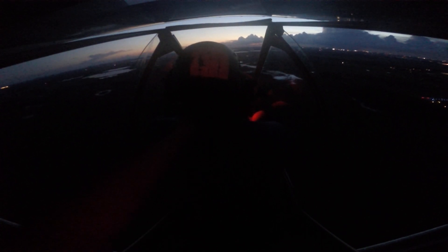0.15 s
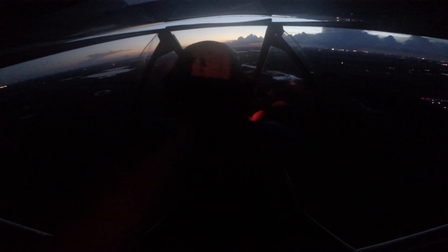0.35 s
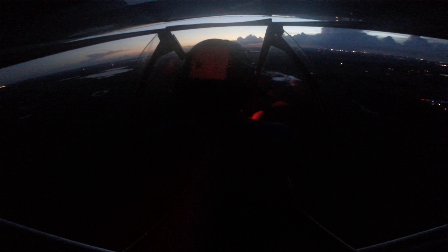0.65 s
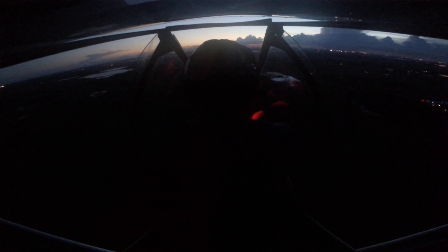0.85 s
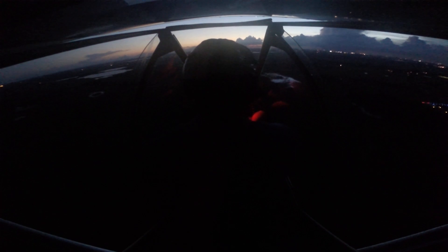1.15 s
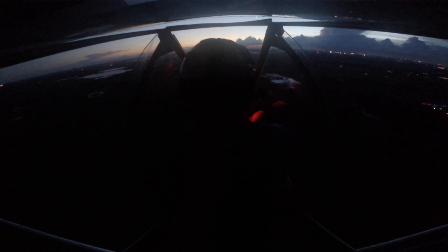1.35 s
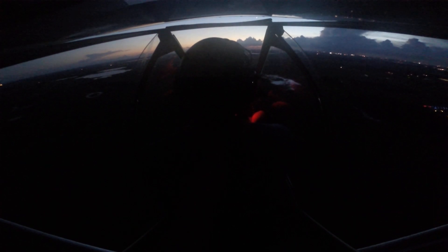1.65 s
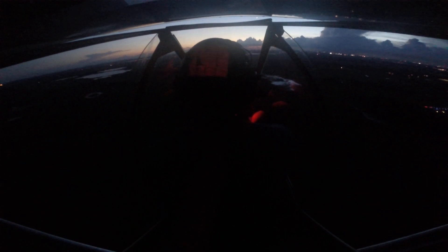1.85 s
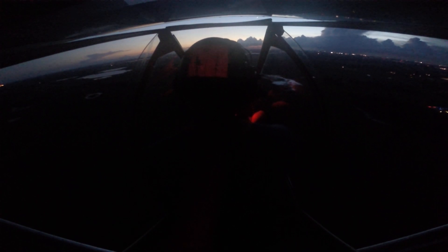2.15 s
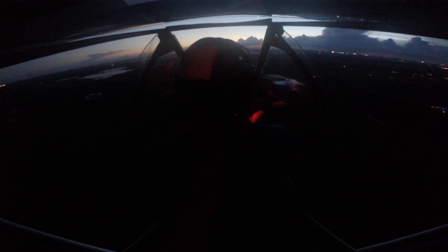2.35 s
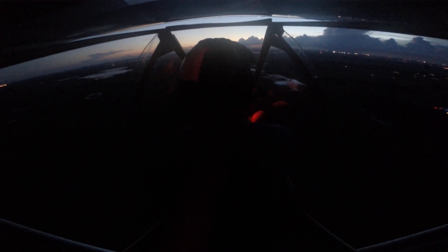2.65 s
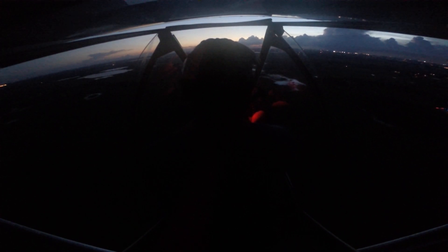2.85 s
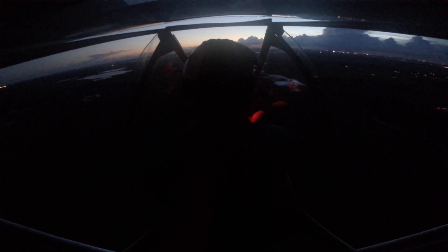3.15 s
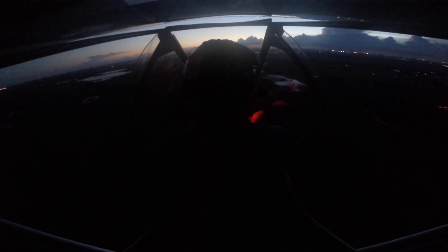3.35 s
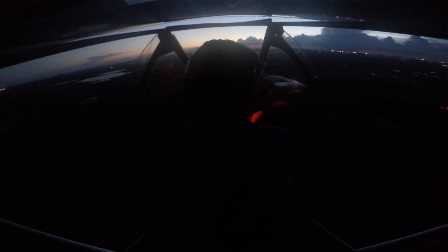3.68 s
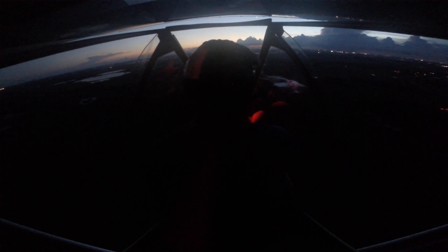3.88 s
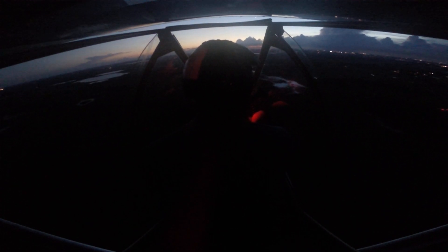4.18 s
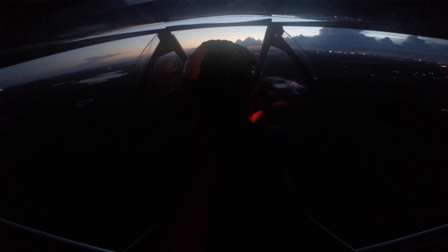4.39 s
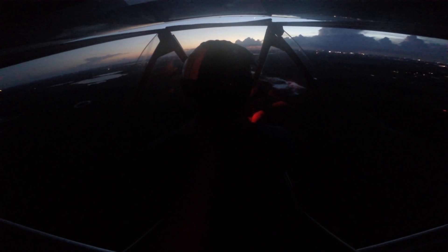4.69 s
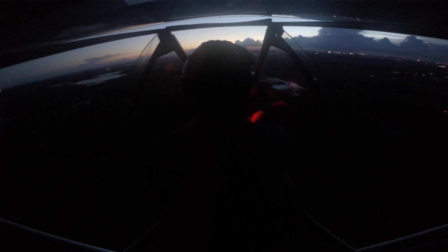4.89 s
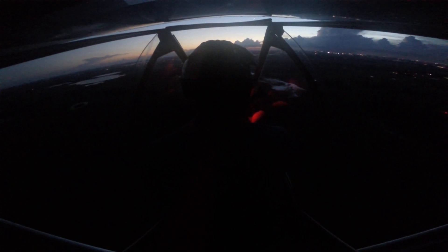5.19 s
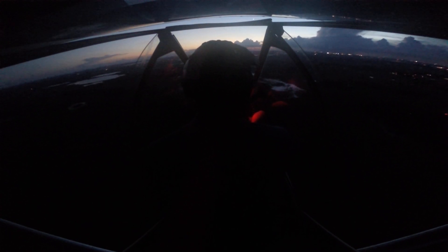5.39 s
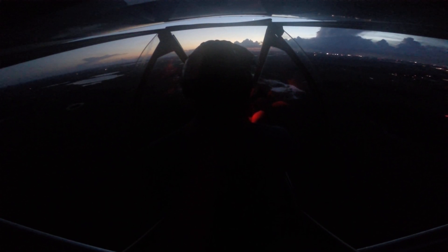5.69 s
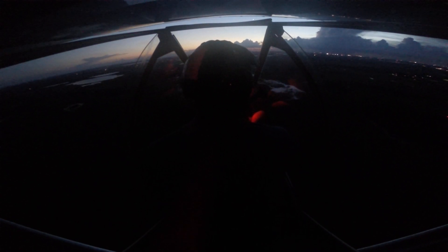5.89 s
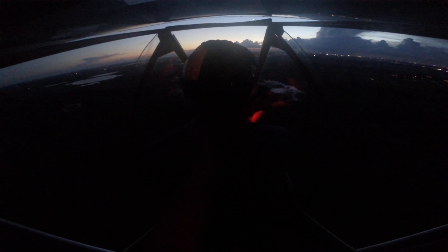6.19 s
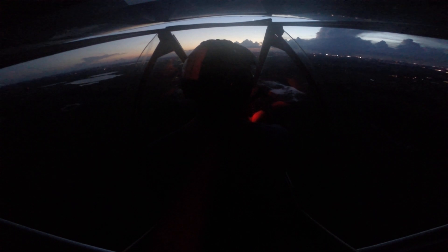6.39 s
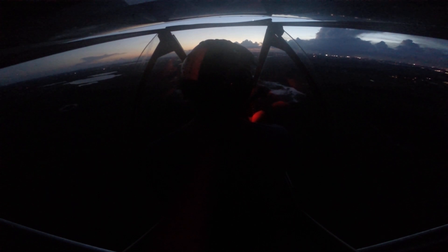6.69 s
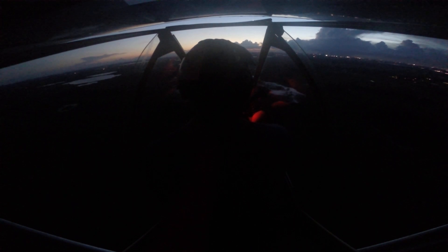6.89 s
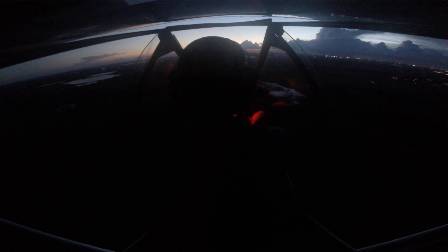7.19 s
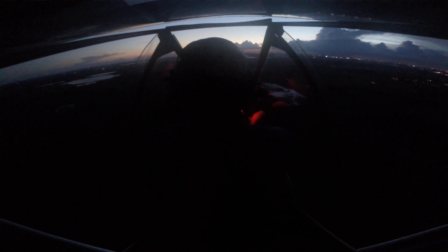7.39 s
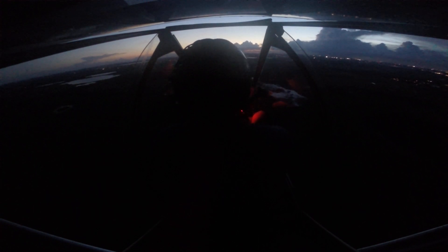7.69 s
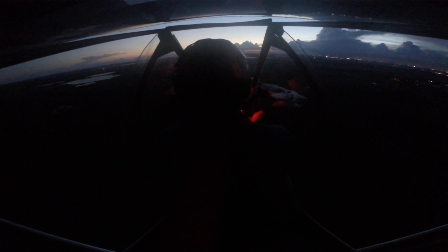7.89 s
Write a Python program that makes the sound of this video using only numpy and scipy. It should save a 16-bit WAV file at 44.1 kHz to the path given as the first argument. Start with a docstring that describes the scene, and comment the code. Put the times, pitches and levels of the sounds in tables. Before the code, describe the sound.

A continuous raspy engine drone with low propeller throb fills a small open aircraft, heard from just behind the pilot. Rattling and panel buzz ride on it, then soften as the engine slows slightly and its tone colour shifts. Buffeting wind and grainy hiss grow a little stronger. In the last couple of seconds irregular clacks and brief metal ticks join.

```python
"""Ultralight cockpit in flight

The open cockpit: a two-stroke twin, built from exhaust overtones, turns a geared three-blade propeller.
The throttle is eased after two seconds, so the overtones change weight and slide through the cabin's
resonances, while the wash of filtered noise grows louder. A panel buzzes at cruise power and then fades
back; later noise bursts clack in the frame, and a loose fitting ticks with short decaying sines."""
import sys
import numpy as np
from scipy import signal
from scipy.fft import rfft, irfft, next_fast_len
from scipy.io import wavfile
from scipy.ndimage import uniform_filter1d, map_coordinates

SR = 44100
rng = np.random.default_rng(int(sys.argv[2]) if len(sys.argv) > 2 else 0)


def master(y):
    """Save y as 16-bit WAV."""
    cut = np.clip(np.atleast_2d(y).T, -1, 1)
    pcm = np.round(cut * 32767)  # scale
    wavfile.write(sys.argv[1], SR, pcm.astype(np.int16))


N = 354563
TIME = np.arange(N) / SR  # s

CRUISE_HZ, EASED_HZ = 90.4, 83.4  # crank turns per second that count as cruise and as fully eased
GEAR = 2.58  # crank turns per propeller turn
# crank speed: it drifts at cruise, settles lower when the throttle is eased, then sags on
START_HZ, DRIFT_HZ_PER_S = 90.53, 0.125
EASE_AT_S, EASE_DROP_HZ, SETTLE_S, SAG_HZ_PER_S = 2.35, 3.53, 0.81, 0.6
# turbulent wash: cruise level, rise as the engine slows, and one quick swell
WASH_DB, WASH_RISE_DB = -39, 2
SWELL_AT_S, SWELL_S, SWELL_DB = 2.85, 0.55, 1.72
# the panel's buzz holds at cruise, then drops
BUZZ_DB, BUZZ_HOLD_S, BUZZ_RELEASE_S, BUZZ_DROP_DB = -44.5, 1.87, 1.3, 10
# the fitting works loose: it is struck on more and more propeller turns, and harder
LOOSE_AT_S, LOOSEN_S = 7.0904, 0.45
TICK_DB, TICK_GROWTH_DB, TICK_SCATTER_DB = -46, 5.5, 3.5  # before the trims in fitting()
FIRST_TICK_CHANCE, LOOSE_TICK_CHANCE = 0.3, 0.55  # share of turns with a tick
TICK_ATTACK_S = 0.0002  # time constant of the ring's onset
TOP_HZ = 15100  # upper edge of the sound

# colour of the slipstream's hiss and the fitting's contact: (frequency [Hz], relative level [dB])
HISS_COLOUR = [(2500, -12), (4000, -11), (4650, 6), (5050, -4), (5600, 0.5), (6700, -8), (7900, -7),
               (9000, -15.5), (9950, -20), (10500, -13), (11250, -22), (11950, -19), (13000, -22.5),
               (15000, -30)]


def undb(db):
    """Decibels to gain."""
    return 10 ** (np.asarray(db) / 20)


def unit(x):
    """Scale to rms 1."""
    return x / np.std(x)


def colour(x, points):
    """Filter by a spectrum of (Hz, dB) points, falling 30 dB an octave outside them; rms 1."""
    hz, db = np.transpose(points)
    size = next_fast_len(N)
    f = np.maximum(np.arange(size // 2 + 1) * SR / size, 1)
    octaves_outside = np.abs(np.log2(f / np.clip(f, hz[0], hz[-1])))
    gain = undb(np.interp(np.log(f), np.log(hz), db) - 30 * octaves_outside)
    return unit(irfft(rfft(x, size) * gain, size)[:N])


def walk(rate):
    """Smooth random wander that changes about rate times a second; rms 1."""
    hold = max(int(SR / rate), 1)
    steps = np.repeat(rng.standard_normal(N // hold + 1), hold)
    smooth = uniform_filter1d(uniform_filter1d(steps, hold), hold)
    return unit(smooth[:N])


def bursts(turns, sharp):
    """A swell to 1 once a turn, narrower as sharp grows."""
    return np.exp(sharp * (np.cos(2 * np.pi * turns) - 1))


def overtone(turns, multiple, lag):
    """One line of a repeating pulse, late by lag of its own cycles; rms 1."""
    return np.sqrt(2) * np.cos(2 * np.pi * (multiple * turns - lag))


def knocks(rows, points, decay_s):
    """Short bursts of coloured noise, each peaking at the level of its (s, dB) row."""
    out = np.zeros(N + SR)
    noise = colour(rng.standard_normal(N), points)
    age = TIME[:SR // 25]
    envelope = age * np.exp(-age / decay_s)
    for index, (s, db) in enumerate(rows):
        burst = noise[index * len(age):][:len(age)] * envelope
        out[int(s * SR):][:len(age)] += undb(db) * burst / np.abs(burst).max()
    return out[:N]


def crank_speed():
    """Turns per second: a slow drift, a quick settling as the throttle is eased, and a steady sag after it."""
    since_ease = np.maximum(TIME - EASE_AT_S, 0)
    cruise = START_HZ - DRIFT_HZ_PER_S * np.minimum(TIME, EASE_AT_S)
    settling = EASE_DROP_HZ * (1 - np.exp(-since_ease / SETTLE_S))
    return cruise - settling - SAG_HZ_PER_S * since_ease


def engine(hz, turns, eased, jitter=0.0013, flutter_db=0.53, roughen=0.18, pulse_lag=0.12, pipe_lag=0.39):
    """Exhaust pulses as a stack of overtones; the firings come a little unevenly."""
    # (multiple of the crank rate, cruise level [dB], eased level [dB]), before the cabin
    exhaust_lines = [(1, -26.5, -20), (2, -26, -21.5), (3, -28.5, -28), (4, -15.5, -22), (5, -35.5, -23.5),
                     (6, -52, -37.5), (7, -48, -48), (8, -32.5, -49.5), (9, -36.5, -39.5), (10, -45, -32.5),
                     (11, -43, -33), (12, -33.5, -44), (13, -37.5, -28), (14, -38.5, -46.5),
                     (15, -40.5, -33.5), (16, -49, -38.5), (17, -50, -48), (18, -42.5, -47),
                     (19, -48.5, -74), (20, -41, -46.5), (21, -40, -48), (22, -54.5, -46.5), (23, -50, -45),
                     (24, -47.5, -37), (25, -39.5, -33.5), (26, -57, -55), (27, -44.5, -34),
                     (28, -49, -42.5), (29, -51.5, -57), (30, -51, -40), (31, -51, -45.5), (32, -57, -40)]
    # peaks and notches the overtones slide through: (centre [Hz], width [Hz], gain [dB])
    cabin_modes = [(260.2, 7, 6), (433.2, 25, 5.5), (706, 13, 5.5), (781, 17, 4.5), (946, 32, 3.5),
                   (1048, 25, -19), (1105, 17, -10.5), (1221, 43.5, 13.5), (1436.7, 66, 22), (1562, 44, 10),
                   (2230, 39, 3.5), (2320, 32, 2)]
    # a two-stroke runs less evenly under a lighter load
    rough = 1 + roughen * eased
    uneven = turns + jitter * rough * walk(45)
    out = 0
    for multiple, cruise_db, eased_db in exhaust_lines:
        line_hz = multiple * hz[::100]  # every 100th sample is enough for the slow slide
        cabin_db = sum(db / (1 + (2 * (line_hz - f) / width) ** 2) for f, width, db in cabin_modes)
        cabin_db = np.interp(TIME, TIME[::100], cabin_db)
        db = cruise_db + eased * (eased_db - cruise_db) + cabin_db
        # the high overtones flutter most in the moving air
        db = db + flutter_db * rough * multiple / 10 * walk(9)
        # the thump comes first, the pipe's ring follows, and reflections scatter everything higher
        lag = pulse_lag + pipe_lag * max(multiple - 3, 0) if multiple < 6 else rng.random()
        out = out + undb(db) * overtone(uneven, multiple, lag)
    return out


def puffs(turns):
    """A puff of gas from each cylinder, one nearer than the other."""
    return 1 + 0.58 * bursts(turns, 14) + 0.4 * bursts(turns + 0.23, 8.8)


def clatter(turns, eased, clatter_db=-4.0, follow=0.6, jitter=0.0017):
    """Pistons and gears repeat the same bright rattle on every crank turn, with a little play."""
    # (frequency [Hz], relative level [dB])
    clatter_colour = [(2300, -7), (2850, -5), (3250, -3.5), (3850, -5), (4200, -8), (4700, -15.5),
                      (5600, -15), (6700, -19), (8800, -25), (10500, -24), (11200, -33), (12000, -28.5),
                      (15000, -39)]
    one_turn = rng.standard_normal(int(SR / CRUISE_HZ))
    place = (turns + jitter * walk(45)) % 1 * len(one_turn)
    repeated = map_coordinates(one_turn, [place], order=3, mode="grid-wrap")
    # its level follows part of the wash's rise
    wash_db = wash(eased)
    mean_db = wash_db.mean()
    db = clatter_db + mean_db + follow * (wash_db - mean_db)
    return colour(repeated * puffs(turns), clatter_colour) * undb(db)


def propeller(turns, eased, flutter_db=0.86):
    """The shaft's unbalance throbs; three blades drone in uneven air and chop the exhaust into side tones."""
    # unbalance and blade passes: (multiple of the shaft rate, cruise level [dB], eased level [dB])
    blade_tones = [(1, -26.5, -26.5), (3, -38, -37.5), (6, -29, -24.5), (9, -36, -31.5), (12, -33, -35),
                   (15, -38, -31), (18, -49, -46.5), (21, -48, -37.5)]
    # chopped exhaust: (crank multiple, shaft multiple, cruise level [dB], eased level [dB])
    side_tones = [(2, 3, -52.5, -32.5), (4, -1, -38, -55.5), (4, 1, -42, -39.5), (8, -1, -43, -58)]
    shaft = turns / GEAR
    out = 0
    for multiple, cruise_db, eased_db in blade_tones:
        db = cruise_db + eased * (eased_db - cruise_db) + flutter_db * walk(9)
        out = out + undb(db) * overtone(shaft, multiple, rng.random())
    for of_crank, of_shaft, cruise_db, eased_db in side_tones:
        db = cruise_db + eased * (eased_db - cruise_db)
        out = out + undb(db) * overtone(turns, of_crank + of_shaft / GEAR, rng.random())
    return out


def panel(turns, snap_db=2):
    """A panel shaken four times a crank turn buzzes on its frame, hardest once a turn, with sharper snaps."""
    # (frequency [Hz], relative level [dB])
    panel_colour = [(2000, -14), (3700, -1), (5000, -2.5), (5600, .7), (6600, -10), (7250, -1), (8150, 0),
                    (9200, -14), (12000, -20), (15000, -29)]
    # sharper snaps, before the snap_db trim: (time [s], level [dB])
    snaps = [(0.1136, -23), (0.632, -28), (0.6667, -24), (0.852, -28), (1.5823, -29)]
    contact = bursts(4 * turns, 3) * bursts(turns + 0.1, 0.45) * undb(1.6 * walk(200))
    released = np.clip((TIME - BUZZ_HOLD_S) / BUZZ_RELEASE_S, 0, 1)
    buzz = colour(rng.standard_normal(N) * contact, panel_colour)
    buzz = buzz * undb(BUZZ_DB - BUZZ_DROP_DB * released)
    return buzz + undb(snap_db) * knocks(snaps, panel_colour, decay_s=0.00042)


def frame(clack_db=-2):
    """The frame gives dry clacks: noise bursts that die within milliseconds."""
    # before the clack_db trim: (time [s], level [dB])
    clacks = [(5.3905, -16), (6.337, -18), (6.5516, -13.5), (6.7059, -16), (6.7653, -16), (6.9205, -12),
              (6.98, -14), (7.195, -11), (7.289, -11.5), (7.5208, -13), (7.5655, -10)]
    # (frequency [Hz], relative level [dB])
    frame_colour = [(1800, 0), (2900, 5.5), (3800, 2), (4400, -14), (6000, -14.5), (8200, -20),
                    (11000, -35), (15000, -43)]
    return undb(clack_db) * knocks(clacks, frame_colour, decay_s=0.0017)


def ticks(turns):
    """Rows (s, dB): the loose fitting can be struck once a propeller turn, always at the same shaft angle."""
    shaft = turns / GEAR
    first_angle = np.interp(LOOSE_AT_S, TIME, shaft)
    times = np.interp(np.arange(first_angle, shaft[-1]), shaft, TIME)
    loose = np.clip((times - LOOSE_AT_S) / LOOSEN_S, 0, 1)
    luck, force = rng.random((len(times), 2)).T
    db = TICK_DB + TICK_GROWTH_DB * loose + TICK_SCATTER_DB * (2 * force - 1)
    chance = np.interp(loose, [0, 1], [FIRST_TICK_CHANCE, LOOSE_TICK_CHANCE])
    return np.column_stack([times, db])[luck < chance]


def fitting(turns, tick_db=-6, contact_db=7):
    """A small metal part is knocked on some turns of the propeller: a dry contact and a brief ring."""
    # ring of the metal: (frequency [Hz], 60 dB decay time [s], relative level [dB])
    ring_modes = [(3380, .025, 21), (3750, 0.023, 24), (4750, 0.012, 8), (6200, .02, 3), (8800, .02, 2),
                  (11950, .025, -2), (13400, .03, -2)]
    out, age = np.zeros(N + SR), TIME[:SR // 10]
    onset = 1 - np.exp(-age / TICK_ATTACK_S)
    strikes = ticks(turns)
    for s, db in strikes:
        start = int(s * SR)
        for hz, t60, mode_db in ring_modes:
            # each strike detunes the modes slightly
            struck_hz = hz * (1 + 0.004 * rng.standard_normal())
            ring = np.sin(2 * np.pi * struck_hz * age) * onset * np.exp(-np.log(1000) * age / t60)
            out[start:start + len(age)] += undb(db + mode_db + tick_db) * ring
    return out[:N] + undb(contact_db) * knocks(strikes, HISS_COLOUR, decay_s=0.002)


def wash(eased):
    """Level of the turbulent wash in dB: one quick swell, and a rise as the engine slows."""
    swell = np.clip((TIME - SWELL_AT_S) / SWELL_S, 0, 1)
    return WASH_DB + SWELL_DB * swell + WASH_RISE_DB * eased


def airflow(turns, eased, buffet_db=8.0, rasp_db=10.0, hiss_db=-9, hiss_follow=1.27, grain_db=2.0):
    """Low buffeting, and a rasp and a grainy hiss that pulse with the exhaust and the blades."""
    # air buffeting the pod: (frequency [Hz], relative level [dB])
    buffet_colour = [(15, -25), (30, -5), (40, 3.5), (55, -4.5), (100, -5.5), (170, -5.5), (235, 3.5),
                     (300, -5.5), (370, 0.5), (440, -6.5), (540, -13), (800, -15.5)]
    # exhaust gas and blade wakes: (frequency [Hz], relative level [dB])
    rasp_colour = [(350, -19), (550, -9.5), (740, -4.5), (920, -1.5), (1060, -2), (1320, 0.5), (1720, -1),
                   (1960, -6), (2130, -0.5), (2560, -8), (2690, -4.5), (3300, -12), (3850, -8), (4250, -21)]
    wash_db = wash(eased)
    mean_db = wash_db.mean()
    pipe_ring, blades = 5 * turns, 3 * turns / GEAR
    pulsing = puffs(turns) * bursts(pipe_ring, 0.17) * bursts(blades, 0.085)
    noise = rng.standard_normal((3, N))
    buffet = colour(noise[0], buffet_colour) * undb(wash_db + buffet_db + 1.2 * walk(11))
    rasp = colour(noise[1] * pulsing * undb(0.8 * walk(120)), rasp_colour) * undb(wash_db + rasp_db)
    hiss = colour(noise[2] * pulsing * undb(grain_db * walk(500)), HISS_COLOUR)
    # the hiss swings further than the wash itself
    hiss = hiss * undb(mean_db + hiss_db + hiss_follow * (wash_db - mean_db))
    return buffet + rasp + hiss


def scene():
    """The crank's speed sets the engine-driven sounds and tells how far the throttle is eased."""
    hz = crank_speed()
    turns = np.cumsum(hz) / SR
    eased = (CRUISE_HZ - hz) / (CRUISE_HZ - EASED_HZ)
    drive = engine(hz, turns, eased) + clatter(turns, eased) + propeller(turns, eased)
    rattles = panel(turns) + frame() + fitting(turns)
    air = airflow(turns, eased)
    return (drive + rattles + air)[None]


def record(dry):
    """A steep elliptic low-pass cuts the treble above TOP_HZ."""
    low_pass = signal.ellip(10, 0.1, 80, TOP_HZ, fs=SR, output="sos")
    return signal.sosfilt(low_pass, dry)


dry = scene()
out = record(dry)
master(out)
```